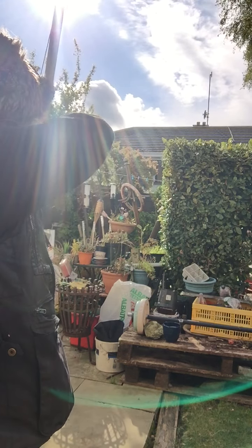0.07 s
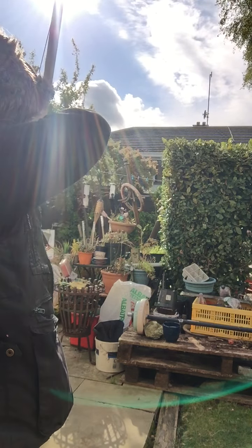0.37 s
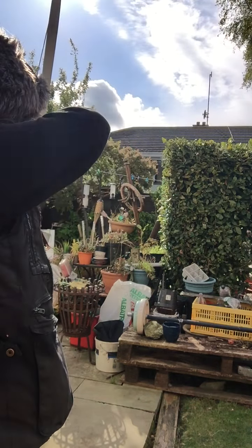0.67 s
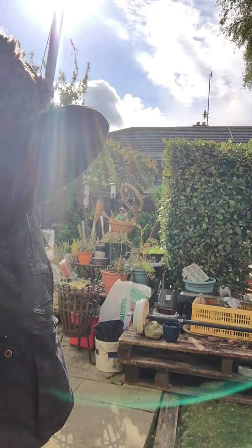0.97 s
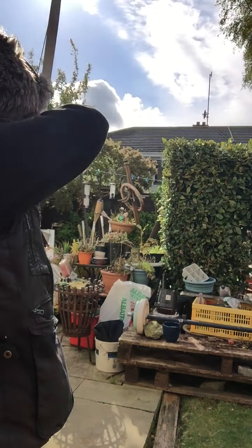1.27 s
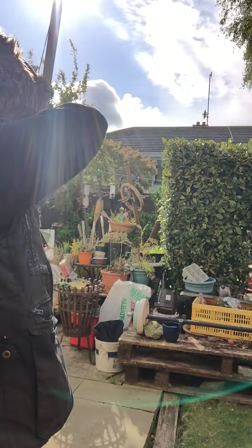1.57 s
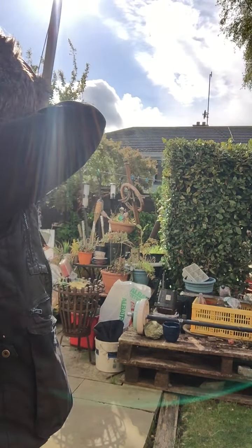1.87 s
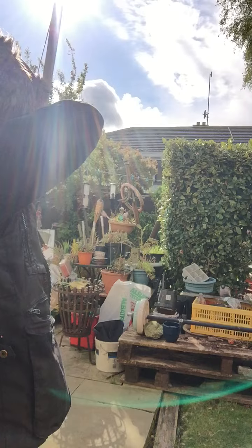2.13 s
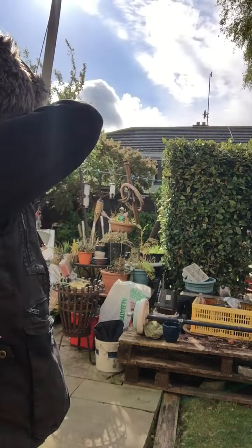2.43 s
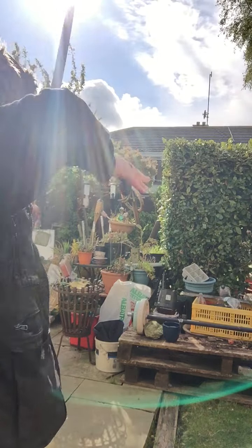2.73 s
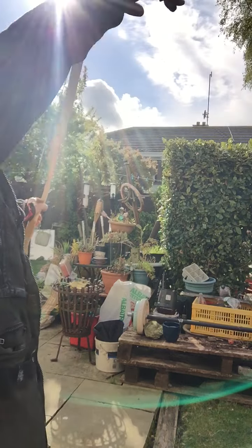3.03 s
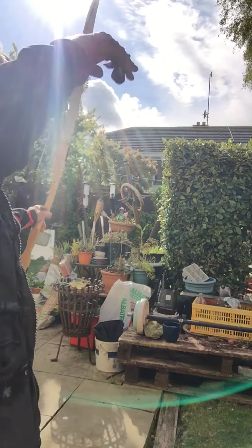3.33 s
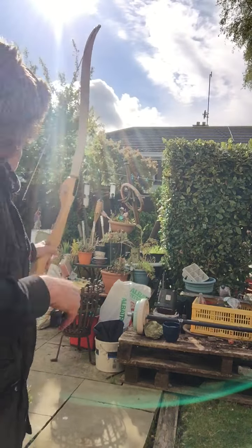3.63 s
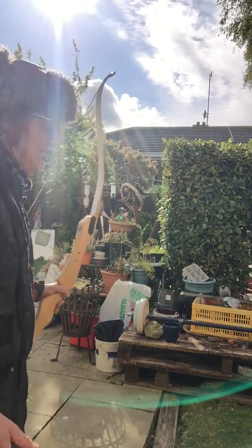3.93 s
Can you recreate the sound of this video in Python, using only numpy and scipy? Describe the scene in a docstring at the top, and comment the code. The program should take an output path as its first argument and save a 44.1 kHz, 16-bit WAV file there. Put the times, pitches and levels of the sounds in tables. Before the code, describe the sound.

In a quiet garden with faint bird chirps and soft microphone bumps, a nearby bowstring snaps forward. A moment later the arrow strikes a target with a cracking thud and a short echo.

```python
"""One arrow in a garden

An archer shoots close to the microphone in a quiet, fenced garden. The string slips off the
fingers, swishes forward, snaps taut and hums; 0.3 s later the arrow thuds into the target and the
fences answer. A small bird repeats a thin two-note call over the outdoor hush, with fainter calls
farther off. A coat sleeve stirs and soft low bumps reach the microphone."""
import sys
import numpy as np
from scipy import signal
from scipy.fft import rfft, irfft
from scipy.io import wavfile

SR = 44100
rng = np.random.default_rng(int(sys.argv[2]) if len(sys.argv) > 2 else 0)


def master_out(mix):
    """Clip the mix to full scale and print it as 16-bit PCM to the path in sys.argv[1]."""
    frames = np.transpose(np.atleast_2d(mix))
    ceiling = np.clip(frames, -1, 1)
    pcm = np.round(ceiling * 32767).astype(np.int16)
    wavfile.write(sys.argv[1], SR, pcm)


N = 176400
T = np.arange(N) / SR


def from_db(db):
    return 10 ** (np.asarray(db) / 20)


def unit_rms(x):
    return x / np.sqrt(np.mean(x ** 2) + 1e-20)


def at_hz(table, hz, column=1):
    """One column of a table, interpolated over log frequency."""
    table = np.array(table)
    return np.interp(np.log(hz + 1e-9), np.log(table[:, 0]), table[:, column])


def low_pass(x, hz, order=2):
    return signal.sosfilt(signal.butter(order, min(hz, SR / 2 - 1), fs=SR, output="sos"), x + 1e-18)


def high_pass(x, hz, order):
    return signal.sosfilt(signal.butter(order, hz, "high", fs=SR, output="sos"), x)


def band_noise(low_hz, high_hz, order=2):
    """Band-passed noise, rms 1."""
    edges_hz = np.clip([low_hz, max(high_hz, low_hz + 20)], 10, SR / 2 - 1)
    band = signal.butter(order, edges_hz, "band", fs=SR, output="sos")
    return unit_rms(signal.sosfilt(band, rng.standard_normal(N)))


def decay(start_s, t60_s):
    """Jumps to 1, then falls 60 dB per t60_s."""
    return (T >= start_s) * np.exp(-np.log(1000) * np.clip((T - start_s) / t60_s, 0, 10))


def arch(start_s, length_s):
    """Half-sine rise and fall."""
    return np.sin(np.pi * np.clip((T - start_s) / length_s, 0, 1))


def ring(start_s, modes):
    """Pressure from damped modes struck together: the slope of their motion."""
    motion = 0
    for hz, db, t60_s in modes:
        omega = 2 * np.pi * hz
        motion += from_db(db) * decay(start_s, t60_s) * np.sin(omega * (T - start_s)) * SR / omega
    return np.diff(motion, prepend=0)


def bursts(rows):
    """Sharp, decaying cracks of band noise."""
    return sum(low_pass(from_db(db) * decay(start_s, t60_s) * band_noise(low_hz, high_hz), 1.1 * high_hz)
               for start_s, db, t60_s, low_hz, high_hz in rows)


def swells(rows):
    """Soft, fluttering swells of band noise."""
    flutter = from_db(2 * band_noise(9.1, 60) - 2.5)
    return flutter * sum(from_db(db) * arch(start_s, length_s) * band_noise(low_hz, high_hz)
                         for start_s, length_s, db, low_hz, high_hz in rows)


def rattle(start_s, table, attack_s, build_s):
    """Quick grainy rattle, then slower scatter, in half-octave bands. Levels are per 2 kHz of width."""
    age_s = np.maximum(T - start_s, 0)
    attack = 1 - np.exp(-age_s / attack_s)
    build = 1 - np.exp(-age_s / build_s)
    edges_hz = 44 * 2 ** (np.arange(18) / 2)
    out = 0
    for low_hz, high_hz in zip(edges_hz, edges_hz[1:]):
        hz = np.sqrt(low_hz * high_hz)
        width_gain = np.sqrt((high_hz - low_hz) / 2000)
        grain = from_db(2 * band_noise(40, 350))
        direct = from_db(at_hz(table, hz, 1)) * decay(start_s, at_hz(table, hz, 2)) * attack * grain
        scatter = from_db(at_hz(table, hz, 3)) * decay(start_s, at_hz(table, hz, 4)) * build
        out += width_gain * np.hypot(direct, scatter) * band_noise(low_hz, high_hz, order=3)
    return out


# Hush spectrum. Each row: frequency in Hz, relative density in dB.
HUSH_SPECTRUM = [(15, -32), (25, -5.5), (59, 0.5), (129, -9.5), (156, -8.5), (368, -11.5), (469, -15.5),
                 (509, -13), (552, -14), (1570, -20), (2770, -27), (4620, -27.5), (5280, -31.5),
                 (5730, -28), (15500, -40.5)]


def outdoor_hush():
    """Steady distant noise, strongest in the bass."""
    colour = from_db(at_hz(HUSH_SPECTRUM, np.fft.rfftfreq(N, 1 / SR)))
    hush = irfft(rfft(rng.standard_normal(N)) * colour, N)
    return from_db(-68) * unit_rms(hush)


# Bumps. Each row: start in seconds, level before the low-pass in dB, frequency in Hz, t60 in seconds.
MIC_BUMPS = [(.036, -34, 118.4, 0.0335), (0.058, -44.5, 72.3, 0.181), (0.157, -49.5, 60.7, 0.37),
             (.197, -40, 57.8, 0.08), (.232, -40, 91.8, 0.093), (.335, -53, 113.5, 0.167),
             (0.365, -45, 121.5, 0.103), (.396, -32.5, 167.4, 0.0291), (.402, -41.5, 55.3, 0.077),
             (0.546, -48, 62.9, 0.163), (0.56, -47.5, 61.6, 0.05), (2.168, -54.5, 62, 0.156),
             (3.314, -57.5, 69.2, 0.092), (3.821, -43.5, 58.8, 0.151), (3.857, -51.5, 45, 0.42),
             (3.9, -45.5, 62, 0.091), (3.928, -40.5, 69, 0.079), (3.942, -38.5, 85.4, 0.057),
             (3.959, -48, 120, .035)]


def microphone_bumps():
    """Each soft bump on the microphone rings one low, damped mode."""
    bumps = sum(ring(start_s, [(hz, db, t60_s)]) for start_s, db, hz, t60_s in MIC_BUMPS)
    return low_pass(bumps, hz=209.2, order=3)


# Cloth rustles. Each row: start and length in seconds, level in dB, low and high edge in Hz.
SLEEVE_RUSTLES = [(.12, 0.189, -76.5, 300, 6960), (.15, 0.1466, -61.5, 127, 292.4),
                  (.31, 0.0797, -60, 131, 295), (3.4, 0.115, -70.5, 120, 400), (3.6, .3, -73.5, 4760, 7380),
                  (3.88, 0.148, -73.5, 300, 4970)]


def sleeve():
    """A coat sleeve stirs faintly."""
    return swells(SLEEVE_RUSTLES)


# Two-note calls. Each row: start and length in seconds, top pitch in Hz, level in dB.
BIRD_NOTES = [(0.16, 0.0818, 5366, -65.5), (0.266, 0.0567, 4930, -68.5), (1.445, 0.0713, 5344, -64.5),
              (1.538, 0.0585, 5010, -67.5), (2.639, 0.0623, 5298, -63), (2.748, .045, 5016, -66),
              (3.696, 0.0606, 5378, -62), (3.806, 0.0438, 5010, -66)]


def bird():
    """Thin arched whistles with a slight warble, blurred by the garden."""
    arch_hz, octave_db, garden_db = 247, -23.5, -8
    warble_hz = 69.54 * band_noise(40, 220)
    rasp = 1 + 0.324 * band_noise(30, 200)
    song = 0
    for start_s, length_s, top_hz, db in BIRD_NOTES:
        effort = arch(start_s, length_s)
        pitch_hz = top_hz + arch_hz * (effort - 1) + warble_hz
        phase = 2 * np.pi * np.cumsum(pitch_hz) / SR
        whistle = np.sin(phase) + from_db(octave_db) * np.sin(2 * phase)
        song += from_db(db) * effort * rasp * whistle
    garden = unit_rms(rng.standard_normal(N) * decay(0.0099, t60_s=0.22)) / np.sqrt(N)
    return song + from_db(garden_db) * signal.fftconvolve(song, garden)[:N]


# Distant calls. Each row: start and length in seconds, level in dB, low and high edge in Hz.
FAR_CALLS = [(.44, 0.044, -80.5, 4520, 5220), (.655, 0.037, -79.5, 2464, 2563),
             (1.3, 0.262, -77, 1568, 1655), (3.735, 0.065, -77.5, 6900, 7350)]


def far_calls():
    """Faint calls from farther off, heard as narrow bands of noise."""
    return swells(FAR_CALLS)


# Finger slip, then string and arrow clacking.
# Each row: start in seconds, level in dB, t60 in seconds, low and high edge in Hz.
BOW_CLACKS = [(2.6655, -47, .03, 2000, 9050), (2.6686, -43.5, 0.0077, 6430, 12200),
              (2.6847, -27, 0.0215, 1790, 5360), (2.6883, -34.5, 0.0063, 1200, 12950),
              (2.6905, -32.5, 0.018, 600, 4000), (2.707, -42.5, 0.0266, 1800, 5000)]
# Limb and string modes. Each row: frequency in Hz, level before the low-pass in dB, t60 in seconds.
BOW_MODES = [(68, -38.5, .2), (127.7, -34, 0.079), (201.2, -33, 0.088), (231.8, -47.5, 0.76),
             (416.6, -48, .6), (496, -46, .48), (558, -54, .5), (657, -53, 0.3), (735.4, -47, 0.36),
             (1021.6, -47.5, 0.32), (1210.6, -37, 0.213), (1505, -53, 0.41), (1755, -47.5, 0.278)]
# Bow rattle and its scatter around the garden.
# Each row: frequency in Hz, rattle level in dB and t60 in seconds, then the same two for scatter.
BOW_RATTLE = [(100, -60, .1, -63.5, .4), (400, -46, 0.065, -42.5, 0.57), (892.3, -37, 0.114, -43.5, 0.43),
              (1816, -28.5, 0.125, -45.5, 0.25), (2600, -34.5, 0.11, -50.5, .29),
              (3600, -34, 0.1015, -51.5, 0.34), (6500, -45, 0.097, -61.5, .27),
              (10013, -57.5, 0.097, -68.5, 0.19), (15000, -53, 0.084, -71, 0.18)]


def bow():
    """The string swishes louder as it gains speed, snaps taut and hums until the hand damps it."""
    slip_s, taut_s, damp_s = 2.664, 2.685, 2.875
    peak_db, rise_db = -35, 25.5
    to_go = np.clip((taut_s - T) / (taut_s - slip_s), 0, 1)
    speed = (T > slip_s) * from_db(peak_db - rise_db * to_go)
    speed *= (T < taut_s) + decay(taut_s, t60_s=0.0207)
    swish = band_noise(1665, 2061) + from_db(-1) * band_noise(71, 754)
    hum = 0
    for mode in BOW_MODES:
        waver = 1 + 0.54 * band_noise(11, 45)
        hum += ring(taut_s + 0.0035, [mode]) * waver
    hand_damping = (T < damp_s) + decay(damp_s, t60_s=0.15)
    hum = low_pass(hum, hz=2200) * hand_damping
    clacks = bursts(BOW_CLACKS)
    return speed * swish + clacks + hum + rattle(taut_s, BOW_RATTLE, attack_s=0.007, build_s=0.012)


# Point piercing the face. Each row: start in seconds, level in dB, t60 in seconds, band edges in Hz.
FACE_CRACKS = [(2.9716, -32, 0.027, 690, 2500), (2.9728, -31.5, 0.00488, 8200, 10320),
               (2.9732, -26.5, 0.0136, 2900, 4420), (2.9738, -27, .012, 800, 1810),
               (2.9739, -40, .006, 10500, 14000)]
# Target and shaft modes. Each row: frequency in Hz, level before filtering in dB, t60 in seconds.
TARGET_MODES = [(147, -13, 0.051), (237.6, -4, .026), (401, -5.5, 0.014)]
SHAFT_MODES = [(563.7, -39, 0.35), (932, -38, 0.14), (1029.3, -39, 0.22), (1122, -42, .26),
               (1391, -41.5, .2), (1570, -40.5, .2), (1726, -38, 0.069), (2913, -54, .13)]
# Shaft and target rattle and its scatter.
# Each row: frequency in Hz, rattle level in dB and t60 in seconds, then the same two for scatter.
HIT_RATTLE = [(60, -39, .1, -39, .45), (170, -26.5, .12, -24, 0.46), (400, -24.5, .12, -27, 0.44),
              (740, -31, .12, -37.5, 0.48), (1600, -24.5, .11, -41.5, .35), (2600, -35, .11, -51, 0.32),
              (4200, -38, .135, -54, .26), (6550, -50.5, .14, -61, 0.23), (10010, -60, .12, -72.5, 0.18),
              (15000, -68, .1, -87, .2)]
# Echoes off ground, walls and fences. Each row: delay in seconds, gain in dB, cutoff in Hz.
THUD_ECHOES = [(.0105, -11, 2003), (0.0154, -3.5, 899.7), (0.0206, -8.5, 600), (0.026, -19.5, 1198),
               (0.04, -20.5, 2500), (0.06, -24.5, 2000), (.089, -28.5, 699.8), (.113, -27, 350),
               (0.129, -32.5, 2000), (.158, -40, 700)]
# Slaps off far hard surfaces. Each row: start in seconds, level in dB, t60 in seconds, band edges in Hz.
FAR_SLAPS = [(3.036, -37.5, 0.0166, 918, 1920), (3.103, -51.5, 0.105, 890, 2200),
             (3.117, -55, 0.059, 1510, 1970), (3.194, -62, 0.0426, 1080, 1270)]


def arrow_hit():
    """The point cracks through the face, the padded target thuds, the shaft rings, the garden echoes."""
    hit_s, padding_hz = 2.9735, 479
    thud = low_pass(ring(hit_s, TARGET_MODES), padding_hz, order=6)
    thud = high_pass(thud, hz=64.81, order=1)
    shaft = low_pass(ring(hit_s, SHAFT_MODES), hz=3500)
    echoes = sum(from_db(db) * low_pass(np.interp(T - delay_s, T, thud), cutoff_hz, order=1)
                 for delay_s, db, cutoff_hz in THUD_ECHOES)
    impact = bursts(FACE_CRACKS) + thud + shaft + echoes + bursts(FAR_SLAPS)
    return impact + rattle(hit_s + 0.001, HIT_RATTLE, attack_s=0.0063, build_s=0.025)


def scene():
    shot = bow() + arrow_hit()
    return (shot + bird() + far_calls() + microphone_bumps() + sleeve() + outdoor_hush())[None]


def record(dry):
    """The microphone drops the deepest bass; the top is cut steeply."""
    cutoff_hz = 15900
    top_cut = signal.ellip(10, 0.1, 70, cutoff_hz, fs=SR, output="sos")
    return signal.sosfilt(top_cut, high_pass(dry, hz=36, order=4))


dry = scene()
out = record(dry)
master_out(out)
```